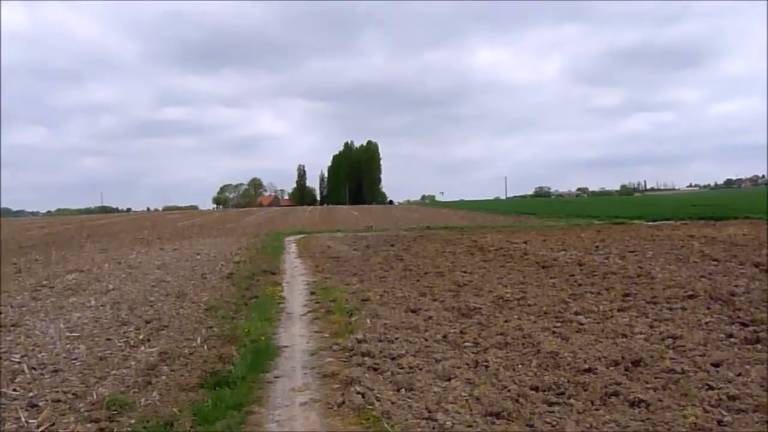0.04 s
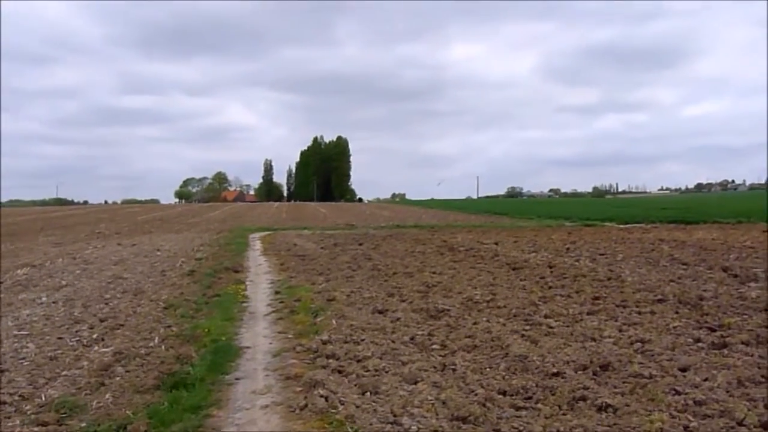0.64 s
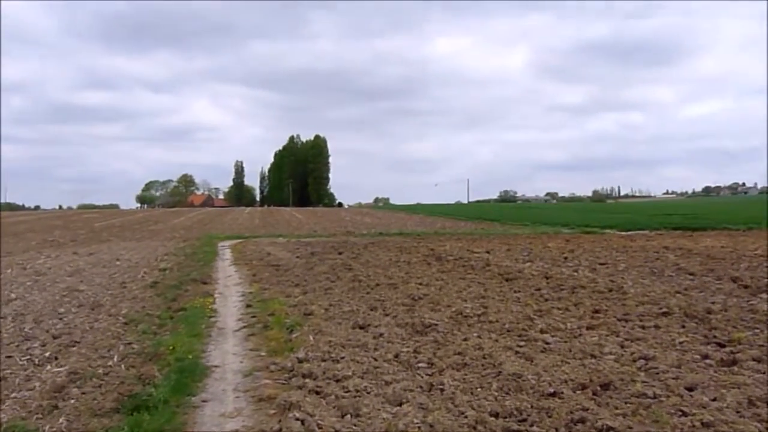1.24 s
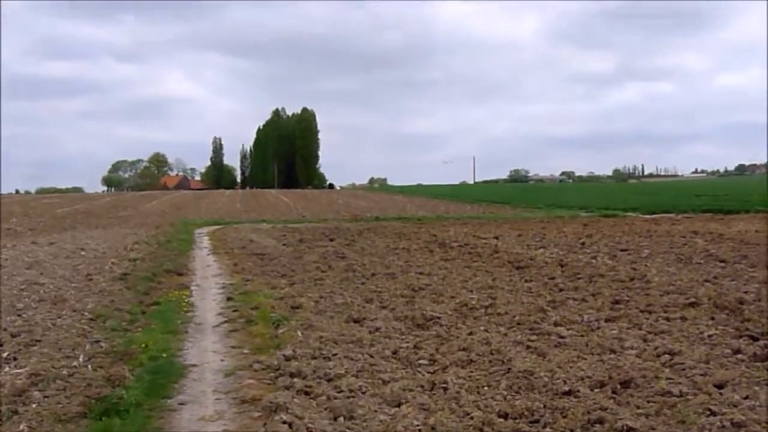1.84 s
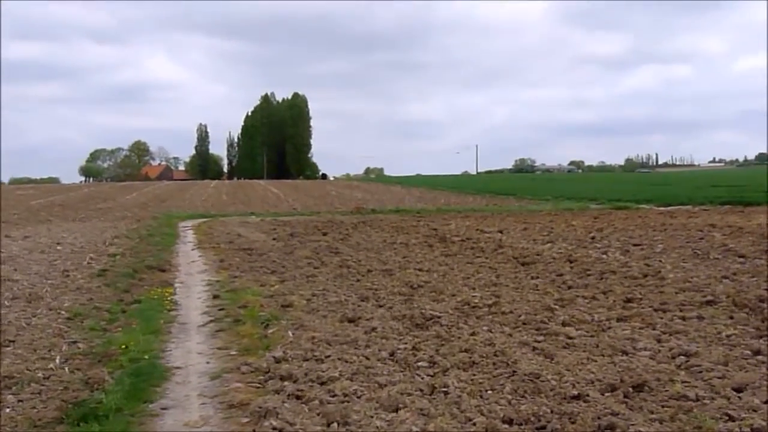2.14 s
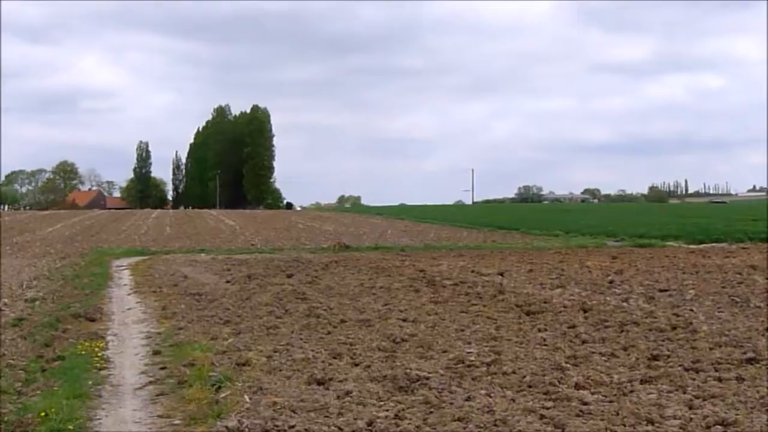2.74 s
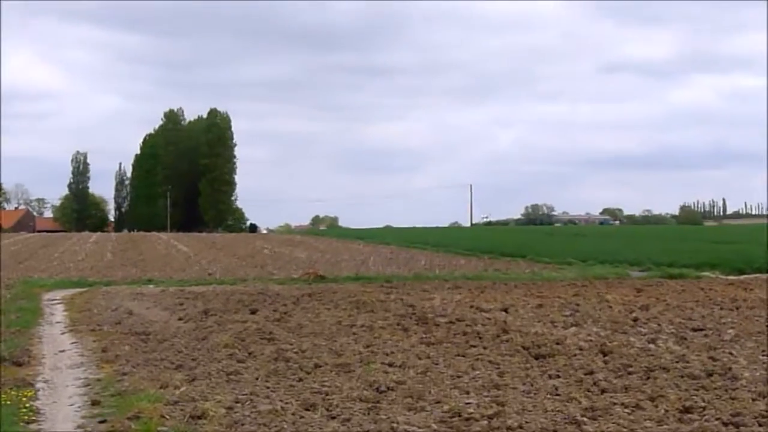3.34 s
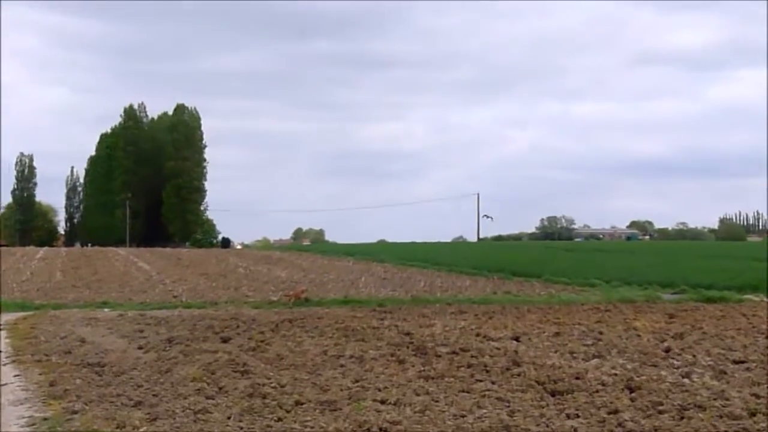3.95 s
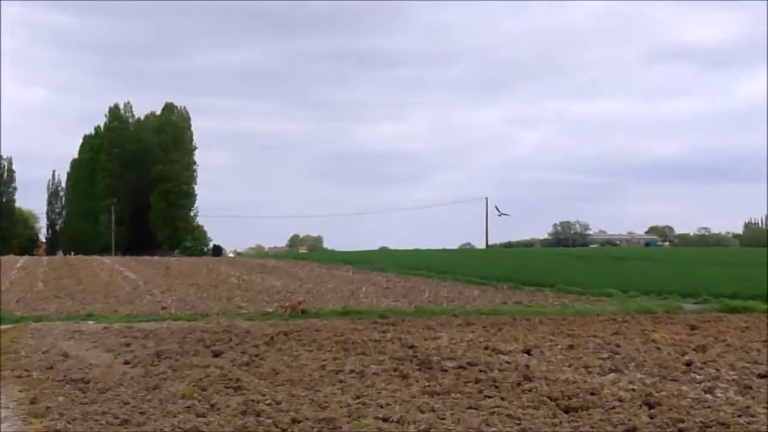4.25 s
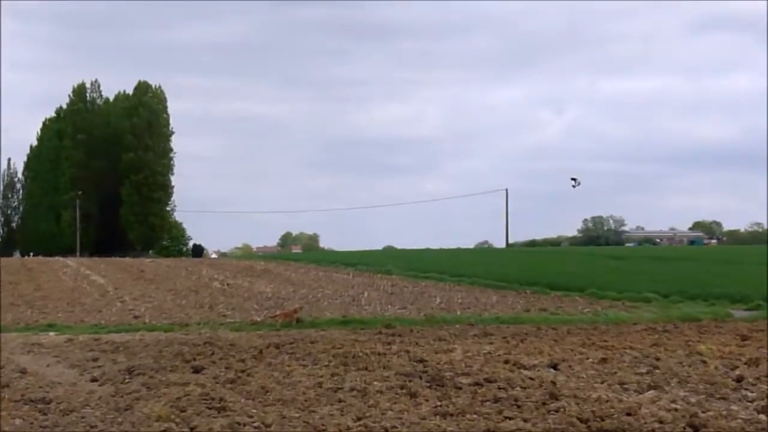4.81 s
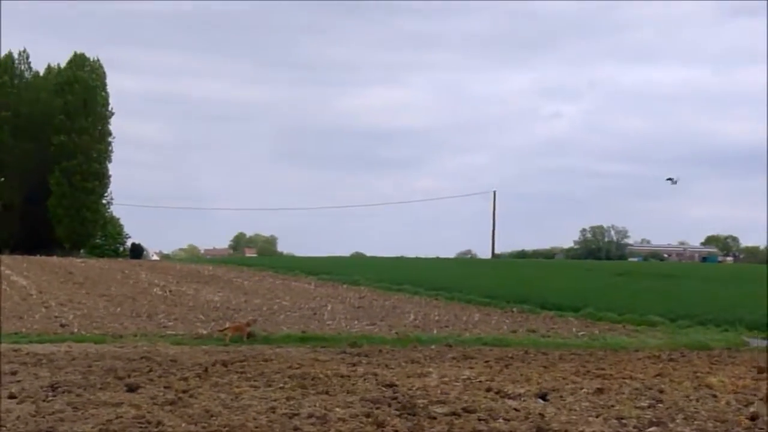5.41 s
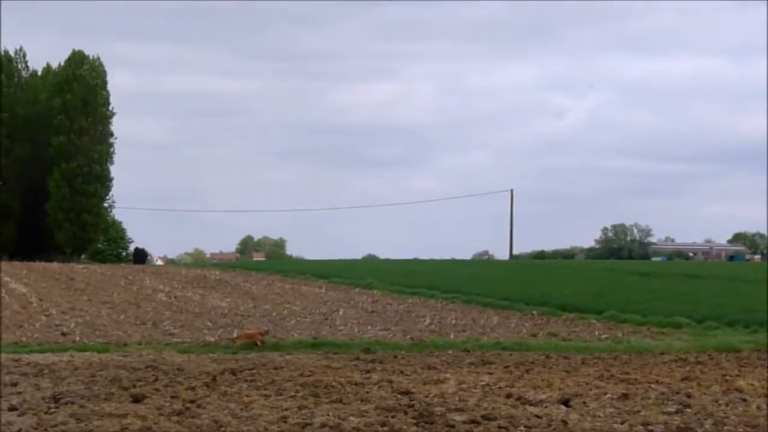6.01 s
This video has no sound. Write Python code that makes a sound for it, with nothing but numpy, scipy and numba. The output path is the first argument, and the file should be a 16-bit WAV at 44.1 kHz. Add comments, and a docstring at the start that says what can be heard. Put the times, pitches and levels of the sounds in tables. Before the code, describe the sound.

In open fields, a distant engine hums steadily under an airy hiss. A lapwing gives four squeaky two-note alarm calls about a second apart, each creaking in the middle, while a small songbird twitters and whistles faintly. Wind on the microphone starts as a light rumble, then buffets and pops from about halfway, ending in heavy gusts that push the other sounds down.

```python
"""Open fields. A distant engine hums and throbs under airy hiss. A lapwing gives four squeaky two-note
alarm calls, a harmonic voice that creaks at the break; a small songbird twitters and whistles faintly.
Wind buffets the microphone harder and harder: turbulence rumbles, passing vortices pop,
and the heaviest pushes make the limiter duck everything."""
import sys
import numpy as np
from scipy import signal
from scipy.fft import rfft, irfft, next_fast_len
from scipy.io import wavfile
from scipy.ndimage import uniform_filter1d, map_coordinates
from numba import njit

SR = 44100
rng = np.random.default_rng(int(sys.argv[2]) if len(sys.argv) > 2 else 0)


def file_out(sig):
    """Save sig as 16-bit WAV at sys.argv[1]."""
    # one column per channel
    cols = np.atleast_2d(sig).T
    # limit, then scale
    lim = np.clip(cols, -1, 1)
    pcm = np.round(lim * 32767).astype(np.int16)
    wavfile.write(sys.argv[1], SR, pcm)


N = 272097
TIME = np.arange(N) / SR

# breeze strength: time_s, level_db
BREEZE_LEVELS = [(0, -57), (.9, -43.5), (1.25, -58.5), (1.7, -40), (2, -49.5), (2.3, -35.5), (2.8, -50),
                 (3.9, -42), (4.1, -29), (4.3, -50), (4.7, -32), (5.15, -50.5), (5.5, -23.5), (5.7, -4.5),
                 (6, -18), (6.17, -7)]
# heavy pushes of air on the diaphragm: centre_s, length_s, peak_db
AIR_PUSHES = [(3.572, 0.011, 4), (4.054, .009, 7.5), (5.402, 0.0078, 8), (5.607, 0.0036, 12),
              (5.76, 0.24, 0), (6.07, 0.0049, -7)]


def undb(db):
    """Decibels to gain."""
    return 10 ** (np.asarray(db) / 20)


def unit(x):
    """Scale to rms 1."""
    return x / np.sqrt(np.mean(x ** 2) + 1e-18)


def curves(rows, t):
    """Table columns interpolated at times t."""
    time_s, *columns = np.transpose(rows)
    return [np.interp(t, np.sort(time_s), column) for column in columns]


def colour(points, hz):
    """Gain at hz of a spectrum given as freq_hz, level_db."""
    freq_hz, level_db = np.transpose(points)
    return undb(np.interp(np.log(hz + 1), np.log(freq_hz), level_db))


def noise(size, shape):
    """Noise of rms 1 with spectrum shape(hz)."""
    n = next_fast_len(size)
    hz = np.arange(n // 2 + 1) * SR / n
    return unit(irfft(rfft(rng.standard_normal(n)) * shape(hz), n)[:size])


def walk(size, rate_hz):
    """Smooth random wander of spread 1."""
    knots = np.arange(size) * rate_hz / SR
    return map_coordinates(rng.standard_normal(size // 10 + 8), [knots + 2], order=1) * np.sqrt(3 / 2)


def band(x, lo_hz, hi_hz):
    """Zero-phase band-pass."""
    return signal.sosfiltfilt(signal.butter(4, [lo_hz, hi_hz], "band", fs=SR, output="sos"), x)


def progress(t, start_s, length_s):
    """Ramp from 0 to 1."""
    return np.clip((t - start_s) / length_s, 0, 1)


def add(out, start_s, x):
    """Mix x into out at start_s."""
    i = max(0, int(start_s * SR))
    out[i:i + len(x)] += x[:max(0, N - i)]


def engine_and_hiss(firing_hz=104.2, hum_db=-40.5, octave_db=-19, throb=0.13, flicker_db=0.36):
    """A distant engine hums and its noise throbs once a firing; airy hiss lies above."""
    # register levels before trim: time_s, body_db, whine_db, hiss_db
    swells = [(0.05, -47.5, -54.5, -50), (1.12, -48, -47.5, -47), (1.45, -41, -45, -43.5),
              (1.97, -46, -47, -49.5), (2.36, -46, -47.5, -46), (2.73, -44.5, -43, -46.5),
              (3.11, -42.5, -42.5, -45.5), (3.37, -46, -46, -49), (3.51, -48, -50.5, -47),
              (3.91, -57.5, -51.5, -54), (4.01, -50.5, -53, -53.5), (4.23, -51.5, -54, -51),
              (4.45, -52, -56, -49.5), (4.66, -49, -55, -52.5), (5.23, -48, -54.5, -47.5),
              (5.3, -44.5, -54, -47.5)]
    # noise colour: freq_hz, density_db
    air_colour = [(130, -12), (230, 5), (850, 6.5), (1200, 18.5), (1550, 18), (1850, 7), (2350, 1),
                  (2700, -4.5), (3600, -5.5), (4400, -3.5), (5300, -9), (6700, -17), (7250, -25),
                  (7700, -45)]
    # narrow engine resonances: centre_hz, width_hz, lift_db
    resonances = [(828, 14, 9), (1092, 12, 6), (1390, 60, 3), (2350, 30, 7)]
    phase = 2 * np.pi * np.cumsum(firing_hz * (1 + .003 * walk(N, 3))) / SR
    hum = np.sin(phase) + undb(octave_db) * np.sin(2 * phase)
    out = np.sqrt(2) * undb(hum_db + .5 * walk(N, 3)) * hum

    def air_gain(hz):
        lift_db = sum(db / (1 + (2 * (hz - centre) / width) ** 2) for centre, width, db in resonances)
        return colour(air_colour, hz) * undb(lift_db)

    spectrum = rfft(noise(N, air_gain) * (1 + throb * np.sin(phase)))
    hz = np.arange(len(spectrum)) * SR / N
    body_db, whine_db, hiss_db = curves(swells, TIME)
    # five overlapping registers, each with its own swell
    centres_hz = [800, 1230, 1750, 2330, 3000]
    levels_db = [-41 + .5 * (body_db - body_db.mean()), body_db + 1, (body_db + whine_db) / 2 - 2,
                 whine_db + 1, hiss_db + 1]
    for share, level_db in zip(np.eye(len(levels_db)), levels_db):
        register = unit(irfft(spectrum * np.interp(hz, centres_hz, share), N))
        out += register * undb(level_db - flicker_db * walk(N, 19))
    return out


def turbulence(size, edge_hz, low_hz=80, slope=3.02, crackle_db=-20, crackle_decay=3.9):
    """Moving air: rumble falling steeply above edge_hz, with spurts of brighter crackle."""
    rumble = noise(size, lambda f: f / np.hypot(f, low_hz) / np.sqrt(1 + (f / edge_hz) ** (2 * slope)))
    spurts = np.exp(.9 * walk(size, 250))
    crackle = noise(size, lambda f: f * np.exp(-f * crackle_decay / (2 * edge_hz)))
    return rumble + undb(crackle_db) * unit(crackle * spurts)


def breeze(restless_db=3):
    """Restless low rumble of air on the microphone."""
    rumble = turbulence(N, edge_hz=160, low_hz=47.4)
    return rumble * undb(curves(BREEZE_LEVELS, TIME)[0] + restless_db * walk(N, 22))


def vortex(width_s):
    """A vortex passes the port: pressure swings one way, then the other; peak 1."""
    u = np.arange(-20 * width_s, 20 * width_s, 1 / SR) / width_s
    return 16 / np.sqrt(27) * u / (1 + u ** 2) ** 2


def sputter(over_breeze_db=2, spread_db=3, width_at_0db_s=0.00071, speed_doubling_db=31.5, count=360):
    """The breeze sheds small vortices at random; stronger ones pass faster."""
    out = np.zeros(N)
    for k, (shift, strength) in enumerate(rng.standard_normal((count, 2))):
        centre_s = (k + shift / 2) / count * N / SR
        peak_db = curves(BREEZE_LEVELS, centre_s)[0] + over_breeze_db + spread_db * np.tanh(strength)
        width_s = width_at_0db_s * 2 ** (-peak_db / speed_doubling_db)
        add(out, centre_s - 20 * width_s, undb(peak_db) * vortex(width_s))
    return out


def buffets():
    """Eddies swell and die on the microphone."""
    # eddies: centre_s, half_length_s, level_db, edge_hz
    eddies = [(0.023, 0.025, -27, 119), (0.526, .048, -28, 105), (0.645, 0.058, -25, 182),
              (1.778, 0.07, -25, 155), (2.231, 0.029, -25.5, 150), (2.557, 0.057, -25.5, 128),
              (2.981, 0.06, -24, 185), (3.188, 0.16, -26.5, 128), (3.504, 0.044, -15, 265),
              (3.546, 0.034, -10, 450), (3.608, 0.027, -7.5, 325), (3.686, 0.069, -15.5, 198),
              (3.815, 0.021, -21.5, 188), (4.015, 0.076, -21.5, 201), (4.092, 0.031, -8, 183),
              (4.195, 0.029, -26, 133), (4.823, .068, -18.5, 174), (4.928, 0.028, -17, 186),
              (5.034, 0.051, -8, 204), (5.378, 0.015, -22, 377), (5.484, .029, -11, 228),
              (5.642, 0.033, 0, 315), (5.72, 0.089, -7, 288), (5.837, 0.057, 4, 340),
              (5.905, .07, -10, 240), (5.959, .024, 0.5, 203), (6.14, .045, -11.5, 304)]
    out, hann_rms = np.zeros(N), np.sqrt(3 / 8)
    for centre_s, half_length_s, level_db, edge_hz in eddies:
        size = int(2 * half_length_s * SR)
        eddy = turbulence(SR // 2, edge_hz)[:size] * np.hanning(size)
        add(out, centre_s - half_length_s, unit(eddy) * undb(level_db) * hann_rms)
    return out


def songbird_twitters(trill_hz=58, waver_hz=45, full_trill_hz=250):
    """Thin far-off notes, sliding or trilled; a trill sounds on its down-strokes."""
    # notes: start_s, length_s, from_hz, to_hz, level_db, trill_depth_hz
    twitters = [(0.474, 0.057, 4340, 3660, -49, 40), (1.611, 0.14, 3900, 3510, -47, 185),
                (3.725, .18, 3820, 4170, -50.5, 77.3), (3.917, 0.065, 4140, 2940, -49, 311)]
    out = np.zeros(N)
    for start_s, length_s, from_hz, to_hz, level_db, depth_hz in twitters:
        t = TIME[:int(length_s * SR)]
        beat = 2 * np.pi * trill_hz * t
        hz = np.linspace(from_hz, to_hz, len(t)) + depth_hz * np.sin(beat) + waver_hz * walk(len(t), 150)
        pulsing = 1 - min(depth_hz / full_trill_hz, 1) * np.cos(beat)
        tone = np.sqrt(2) * np.sin(2 * np.pi * np.cumsum(hz) / SR)
        add(out, start_s, undb(level_db) * signal.windows.tukey(len(t), .5) * pulsing * tone)
    return out


def lapwing_voice(t, hz, third_db, upper_db, rough, fundamental_db, second_db,
                  rasp_hz=75, rasp_depth=.75, breath=.55, fade_s=0.005, low_db_per_octave=22):
    """Harmonic stack led by the third; roughness adds jitter, hiss and uneven pulses."""
    # colour of the upper overtones: freq_hz, level_db
    throat = [(3500, 9), (4700, 9.5), (5300, 16), (6400, 13.5), (7200, 10.5), (8000, -20)]
    size = len(t)
    hz = uniform_filter1d(hz, size=300) * (1 + .045 * rough * walk(size, 800) + .005 * walk(size, 110))
    phase = 2 * np.pi * np.cumsum(hz) / SR
    # the two lowest harmonics come through as the pitch climbs
    arch = undb(low_db_per_octave * np.log2(hz / hz.max()))
    lowest = undb(fundamental_db) * np.sin(phase) + undb(second_db) * np.sin(2 * phase)
    low = np.sin(3 * phase) + arch * lowest
    orders = np.arange(4, 9)[:, None]
    weights = colour(throat, orders * hz)
    uneven = np.exp([.35 * walk(size, 45) for _ in orders])
    upper = (uneven * weights * np.sin(orders * phase)).sum(0) / np.sqrt((weights ** 2).sum(0))
    upper += 2 * np.exp(-((t - .014) / .01) ** 2) * np.sin(4 * phase)  # onset squeak
    upper += breath * rough * unit(band(rng.standard_normal(size), 3300, 6300))
    creak = 1 + rasp_depth * rough * np.sin(2 * np.pi * rasp_hz * t + walk(size, 60))
    flutter = np.exp(.14 * walk(size, 110) + .18 * walk(size, 35))
    edges = np.clip(np.minimum(t, t[-1] - t) / fade_s, 0, 1)
    return np.sqrt(2) * edges * creak * flutter * (undb(third_db) * low + undb(upper_db) * upper)


def lapwing_call(rise_s, fall_s, break_s, top_hz, break_hz, note_hz, fall_bend, attack_s,
                 level_db, note_db, overtones_db, fundamental_db, second_db):
    """A long arched note, a break where the voice thins and creaks, then a short, hoarser note."""
    onset_hz, rebound_hz, sag_hz = 1175, 148.5, 42
    note_s, note_peak_s, note_fade_db = 0.096, 0.018, 7
    attack_db, break_dip_db, accent_db, accent_s, onset_rasp_s = 14, 15.5, 1, 0.0099, 0.014
    upper_db_per_octave, upper_dip_db, note_dull_db, swell_db, swell_s = -7, 11, 1, 3, 0.0085
    break_start_s = rise_s + fall_s
    note_start_s = break_start_s + break_s
    t = TIME[:int((note_start_s + note_s) * SR)]
    rise, fall = progress(t, 0, rise_s), progress(t, rise_s, fall_s)
    cross = progress(t, break_start_s, break_s)
    broken = np.sin(np.pi * cross)
    off_peak = (np.maximum(t - note_start_s, 0) / note_peak_s - 1) ** 2
    strain = np.exp(-((t - break_start_s) / accent_s + 1) ** 2)  # last effort before the break

    arch_hz = onset_hz + (top_hz - onset_hz) * np.sin(np.pi / 2 * rise ** 1.08) ** 2
    arch_hz -= (top_hz - break_hz) * fall ** fall_bend
    hz = (1 - cross) * arch_hz + cross * (note_hz - sag_hz * off_peak) + rebound_hz * broken

    fade_db = cross * note_fade_db * off_peak * (t > note_start_s + note_peak_s)
    third_db = level_db + cross * (note_db - level_db) + accent_db * strain
    third_db -= attack_db * (1 - progress(t, 0, attack_s)) + break_dip_db * broken + fade_db
    upper_db = overtones_db + upper_db_per_octave * np.log2(np.maximum(hz, onset_hz) / 1400)
    upper_db += accent_db * strain - swell_db * (1 - progress(t, 0, swell_s))
    upper_db -= upper_dip_db * broken + note_dull_db * cross + fade_db / 2
    rough = 0.057 + 0.07 * cross + 0.99 * (broken + np.exp(-t / onset_rasp_s)) + .2 * strain
    return lapwing_voice(t, hz, third_db, upper_db, rough, fundamental_db, second_db)


def lapwing(scatter_db=-20, scatter_t60_s=0.069):
    """Four alarm calls and their faint scatter off rough ground."""
    # calls: start_s, rise_s, fall_s, break_s, top_hz, break_hz, note_hz, fall_bend (1 = straight),
    # attack_s, level_db, note_db, overtones_db, fundamental_db, second_db (last two re third harmonic)
    alarms = [(1.000, .122, .121, .079, 1672, 1358, 1040, 1.25, 0.052, -39, -46.5, -49.5, -7, -4.5),
              (2.086, .112, .126, 0.11, 1661, 1370, 1043, 1.86, 0.015, -34.5, -41.5, -45.5, -7.5, -15),
              (3.184, .116, .113, 0.063, 1660, 1203, 1076, 1.2, .022, -30, -31, -46, -5.5, -3.5),
              (4.334, 0.1, 0.11, 0.068, 1555, 1196, 1042, 1.93, 0.04, -35, -37.5, -51.5, -7.5, -15)]
    out = np.zeros(N)
    for start_s, *shape in alarms:
        add(out, start_s, lapwing_call(*shape))
    t = TIME[:SR // 2]
    tail = rng.standard_normal(len(t)) * np.exp(-np.log(1000) * t / scatter_t60_s)
    return out + undb(scatter_db) * signal.fftconvolve(out, tail / np.linalg.norm(tail))[:N]


def wind_pops(spread_s=0.0067, small_db=-10, small_width_ratio=0.86, count=8):
    """Each pop is one strong vortex in a flurry of smaller ones."""
    # strong vortices: centre_s, half_width_s, peak_db
    pops = [(2.235, 0.0025, -12.5), (3.516, 0.0014, -6.5), (3.533, 0.00093, -3), (3.538, 0.00061, -1),
            (3.551, 0.00069, 5), (3.606, 0.00046, -5.5), (4.014, .0013, -10), (4.55, 0.0011, -12),
            (5.37, 0.00083, -7.5), (5.4, 0.0018, -1), (5.602, .00063, 0), (5.654, 0.00032, 2),
            (5.69, .00031, -3), (5.732, 0.00048, -3), (5.772, 0.00078, 4), (5.811, 0.0004, 5),
            (5.842, 0.00046, 9), (5.967, 0.00051, -4), (6.0681, 0.00073, 10.5), (6.116, .00061, 3.5)]
    out = np.zeros(N)
    for centre_s, width_s, peak_db in pops:
        add(out, centre_s - 20 * width_s, undb(peak_db) * vortex(width_s))
        for delay, strength, stretch in rng.standard_normal((count, 3)):
            small_width_s = width_s * small_width_ratio * np.exp(.25 * stretch)
            small = undb(peak_db + small_db) * np.tanh(strength) * vortex(small_width_s)
            add(out, centre_s + spread_s * (delay + .5) - 20 * small_width_s, small)
    return out


def songbird_whistles(start_s=2.592, step_s=.088, first_db=-51, growth_db=2, count=4):
    """An even run of quick downward sweeps, each louder than the last."""
    length_s, glide_s, from_hz, towards_hz = .05, .03, 5700, 2800
    out, t = np.zeros(N), TIME[:int(length_s * SR)]
    hz = towards_hz + (from_hz - towards_hz) * np.exp(-t / glide_s)
    note = np.sqrt(2) * signal.windows.tukey(len(t), .5) * np.sin(2 * np.pi * np.cumsum(hz) / SR)
    for k in range(count):
        add(out, start_s + k * step_s, undb(first_db + k * growth_db) * note)
    return out


def wind_pushes():
    """Heavy one-way pressure pulses on the diaphragm."""
    out = np.zeros(N)
    for centre_s, length_s, peak_db in AIR_PUSHES:
        add(out, centre_s - length_s / 2, undb(peak_db) * np.hanning(int(length_s * SR)))
    return out


def push_ticks(tick_s=0.0052, ref_db=-40, ref_push_s=0.011):
    """A thin tick on the front of each push; the more abrupt the push, the louder."""
    out, size = np.zeros(N), int(tick_s * SR)
    for centre_s, length_s, _ in AIR_PUSHES:
        burst = unit(band(rng.standard_normal(SR // 10), 5300, 7000))[:size] * np.hanning(size)
        add(out, centre_s - length_s / 4 - tick_s / 2, undb(ref_db) * ref_push_s / length_s * burst)
    return out


def scene():
    """Birds, engine and wind at one microphone."""
    birds = lapwing() + songbird_twitters() + songbird_whistles()
    background = engine_and_hiss()
    wind = breeze() + buffets() + sputter() + wind_pops() + wind_pushes() + push_ticks()
    return (birds + background + wind)[None]


@njit
def follow(x, attack_s, release_s):
    """Peak follower: jumps up, sinks slowly."""
    out, envelope = np.empty(len(x)), 0.
    for i in range(len(x)):
        level = abs(x[i])
        envelope += (level - envelope) / (SR * (attack_s if level > envelope else release_s))
        out[i] = envelope
    return out


def record(dry, ceiling=0.26, clip=.62, attack_s=0.0014, release_s=0.1, low_cut_hz=44, top_hz=7900):
    """A fast limiter ducks on heavy pushes; pops overshoot and clip; deep bass and top are cut."""
    gain = np.minimum(1, ceiling / (follow(dry[0], attack_s, release_s) + 1e-9))
    limited = np.clip(dry * gain, -clip, clip)
    bass_cut = signal.sosfilt(signal.butter(2, low_cut_hz, "high", fs=SR, output="sos"), limited)
    return signal.sosfilt(signal.ellip(12, .2, 70, top_hz, fs=SR, output="sos"), bass_cut)


dry = scene()
out = record(dry)
file_out(out)
```